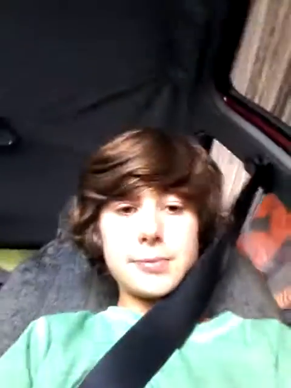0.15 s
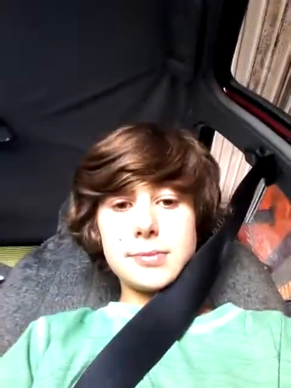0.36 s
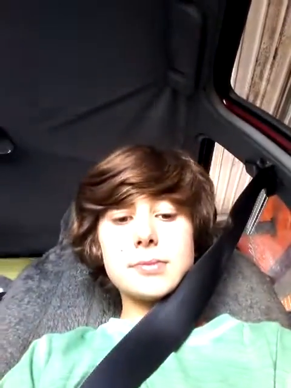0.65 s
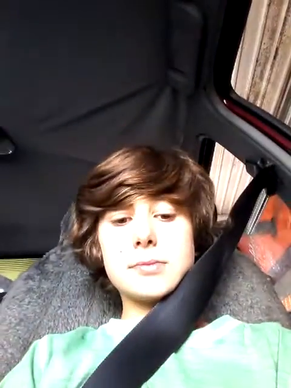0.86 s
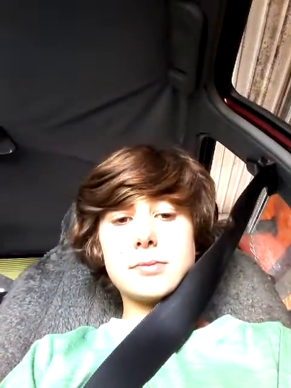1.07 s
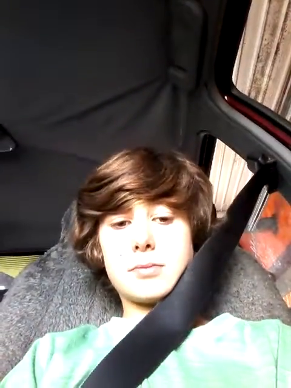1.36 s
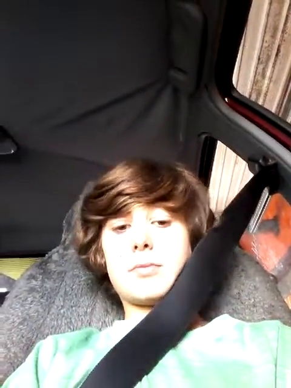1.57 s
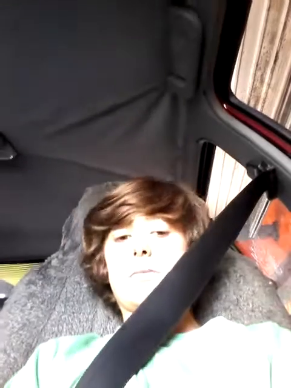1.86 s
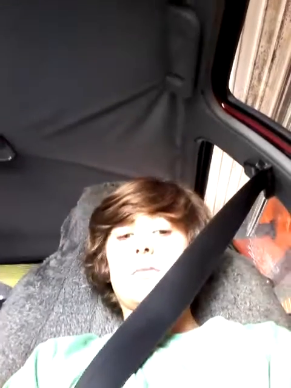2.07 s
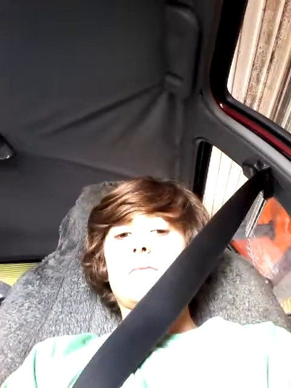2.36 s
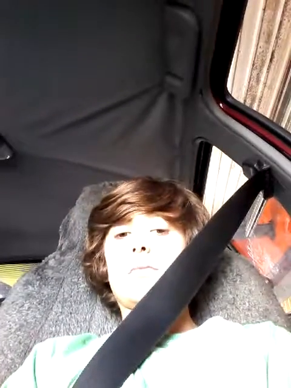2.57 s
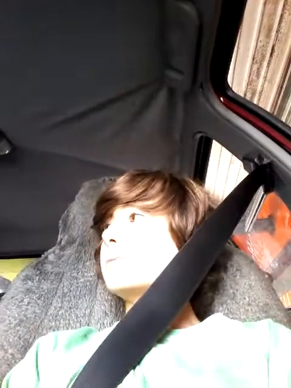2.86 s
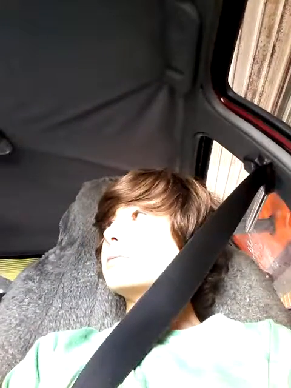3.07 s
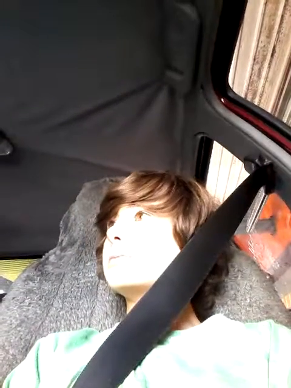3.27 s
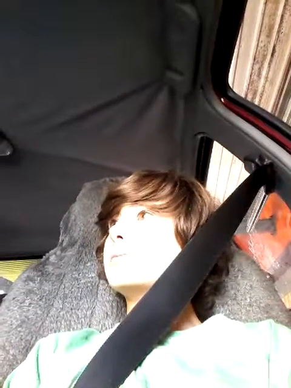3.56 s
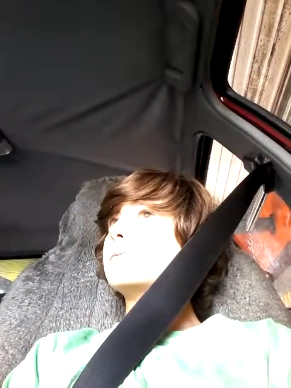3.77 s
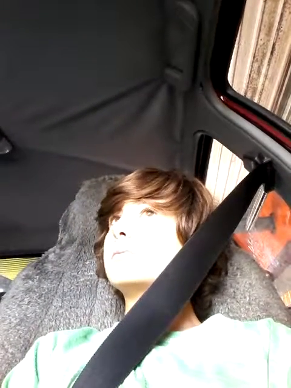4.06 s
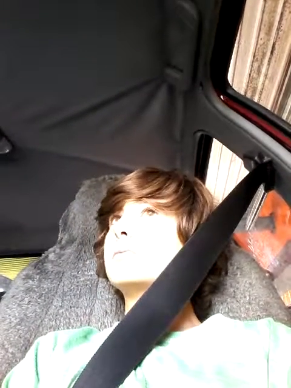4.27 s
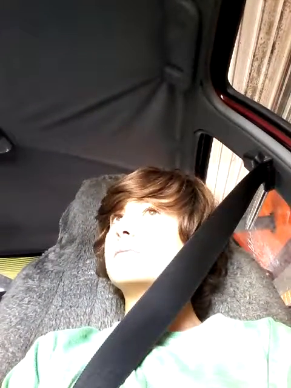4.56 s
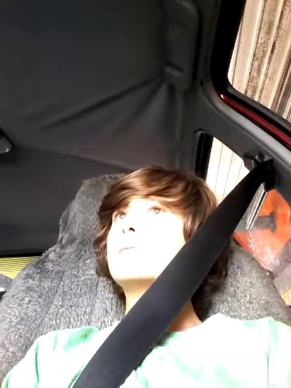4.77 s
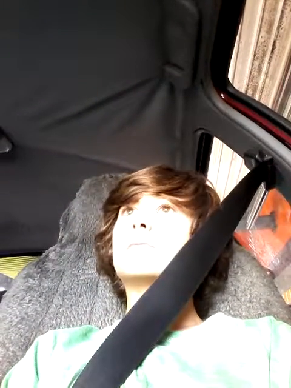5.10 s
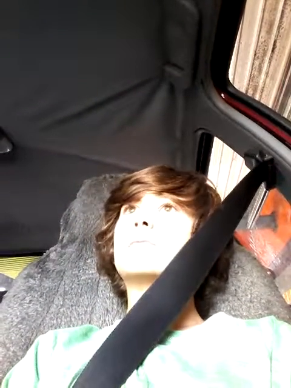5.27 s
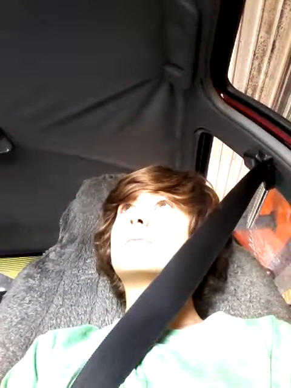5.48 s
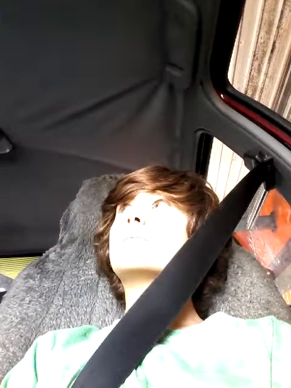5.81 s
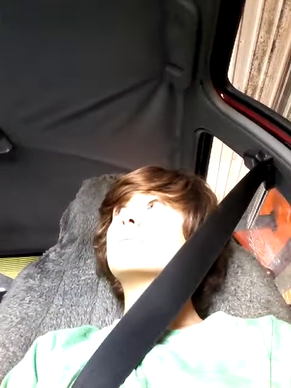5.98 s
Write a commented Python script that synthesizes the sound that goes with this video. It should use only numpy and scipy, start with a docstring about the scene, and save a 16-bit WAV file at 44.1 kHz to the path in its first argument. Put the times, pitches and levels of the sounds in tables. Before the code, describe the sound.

Heard from inside a car, wash-bay dryers roar and boom against the body, a hissing spray crosses the side glass, then the thunder slowly eases.

```python
"""Car wash dryers heard from inside the car

The car creeps out from under the air jets, which buffet its body and make the cabin boom.
The blowers roar and rush in the bay while their fans hum; all are shaped and layered noise.
A jet sweeps over the side glass with a hissing spray: noise and random drops,
with short spatters and the ticks of large drops."""
import sys
import numpy as np
from scipy import signal
from scipy.fft import rfft, irfft
from scipy.io import wavfile

SR = 44100
rng = np.random.default_rng(int(sys.argv[2]) if len(sys.argv) > 2 else 0)


def put_to_file(sound):
    """Save the sound as 16-bit audio at rate SR, in the file named by the first command-line argument."""
    columns = np.atleast_2d(sound).T  # one column per channel
    safe = np.clip(columns, -1, 1)
    whole_steps = np.round(safe * 32767)
    wavfile.write(sys.argv[1], SR, whole_steps.astype(np.int16))


N = 271038
T = np.arange(N) / SR  # time of each sample, in seconds
HZ = np.fft.rfftfreq(N, 1 / SR)  # frequency of each spectrum bin


def gain_of(db):
    """Turns decibels into an amplitude factor."""
    return 10 ** (np.asarray(db) / 20)


def evened(x):
    """Scales a sound to an rms (average strength) of one."""
    return x / np.sqrt(np.mean(x ** 2) + 1e-20)


def spectrum(points):
    """Joins (pitch_hz, level_db) points into a curve on a log-frequency axis."""
    hz, db = np.transpose(points)
    return np.interp(np.log(HZ + 1), np.log(hz + 1), db)


def curve(rows, order=1):
    """Draws one column of a time table as a line through every sample."""
    columns = np.transpose(rows)
    return np.interp(T, columns[0], columns[order])


def coloured(x, db):
    """Filters x by a curve in dB, then scales it to an rms of one."""
    return evened(irfft(rfft(x) * gain_of(db), N))


def noise(db):
    """Makes random noise with the given spectrum in dB."""
    return coloured(rng.standard_normal(N), db)


def eddies(rate_hz):
    """Makes smooth random swings, up to about rate_hz, like swirling air."""
    low_pass = np.exp(-(HZ / rate_hz) ** 2)
    return evened(irfft(rfft(rng.standard_normal(N)) * low_pass, N))


def steadied(x, seconds):
    """Evens out the swells of x that last longer than the given time."""
    smoothing = np.exp(-(HZ * seconds) ** 2 * 2)
    local_power = irfft(rfft(x ** 2) * smoothing, N)
    return x / np.sqrt(np.maximum(local_power, 1e-4))


def buffet(throb_db=1.8, throb_hz=16, shudder_swell_db=2.5, shudder_swell_hz=3):
    """Turbulent jets shake the roof and doors; eddies make the boom throb and the deep shudder swell."""
    # spectrum of the booming panels: pitch_hz [Hz], level_db [dB per Hz]
    boom_points = [(45, -39.5), (68, -15.5), (80, 3.5), (95, -1), (125, -0.5), (172, -2), (195, -10),
                   (235, -15.5), (290, -22.5), (400, -34), (700, -35.5), (1500, -81.5)]
    # spectrum of the body's deep shudder: pitch_hz [Hz], level_db [dB per Hz]
    deep_points = [(20, -30.5), (36, -34), (43, -22.5), (52, -3), (66, 4), (76, -6), (95, -12.5),
                   (200, -80)]
    force_db = jet_force_db()
    boom = noise(spectrum(boom_points) + cabin())
    throbbing = boom * gain_of(throb_db * eddies(throb_hz))
    panels = steadied(throbbing, seconds=0.17) * gain_of(force_db)

    # the shudder is -36 dB at a force of -23.5 dB, and gains 0.54 dB per dB of force
    shudder_db = -36 + 0.54 * (force_db + 23.5)
    swell_db = shudder_swell_db * eddies(shudder_swell_hz)
    body = steadied(noise(spectrum(deep_points)), seconds=0.13) * gain_of(shudder_db + swell_db)
    return panels + body


def jet_force_db():
    """The force of the jets eases unevenly as the car leaves them, with brief gusts on top."""
    # slow force of the jets on the body: time_s [s], level_db [dB]
    slow_force = [(0, -16.5), (.28, -22), (.45, -20), (1.05, -17.5), (1.28, -21), (1.72, -19.5), (2.3, -21),
                  (2.95, -25), (3.45, -26.5), (3.62, -23), (4.2, -26), (5.45, -32.5), (5.93, -31),
                  (6.15, -34)]
    # brief changes of force, nearly all upward: middle_s [s], lift_db [dB], length_s [s]
    gusts = [(0.037, -2.5, 0.026), (0.387, 6.5, 0.053), (0.438, 6, 0.034), (0.663, 3.5, 0.068),
             (1.543, 4, 0.069), (1.765, 4, 0.065), (2.056, 5.5, .05), (2.478, 4.5, 0.043), (5.013, 3, .05)]
    gusts_db = sum(db * np.exp(-(2 * (T - s) / length) ** 2) for s, db, length in gusts)
    return curve(slow_force) + gusts_db


def blowers(flutter_db=0.34, flutter_hz=30):
    """Blown air makes a wide roar in the bay and a higher, fluttering rush at the nozzles."""
    # roar of the bay: pitch_hz [Hz], level_db [dB per Hz]
    roar_points = [(30, -34), (60, -9.5), (110, -4.5), (170, 7), (200, 0.5), (285, 6.5), (440, -3),
                   (540, -3.5), (620, 0.5), (780, -5.5), (950, -11.5), (1250, -13), (1600, -12.5),
                   (2000, -21), (3500, -53)]
    # rush of the nozzles: pitch_hz [Hz], level_db [dB per Hz]
    rush_points = [(600, -27), (1400, -4), (2000, 1), (2400, -0.5), (3300, -1), (4000, -6.5), (4900, -10),
                   (5700, -11.5), (6500, -10), (7300, -17.5), (8200, -31.5), (9500, -34), (15500, -36)]
    # both nearly hold while the jet is on the glass, then fall: time_s [s], roar_db [dB], rush_db [dB]
    blower_levels = [(0, -30.5, -47.5), (1.2, -30, -47), (2.7, -30.5, -46.5), (3.1, -32, -48.4),
                     (4.5, -33, -48), (6.15, -33, -49.5)]
    roar = steadied(noise(spectrum(roar_points) + cabin()), seconds=0.25)
    roar = roar * gain_of(curve(blower_levels))
    rush = noise(spectrum(rush_points) + cabin()) * gain_of(curve(blower_levels, order=2))
    return roar + rush * gain_of(flutter_db * eddies(flutter_hz))


def fans(width_hz=9, beat_db=1.0, beat_hz=0.82, loudest_s=1.05, skirt_width_hz=30, skirt_db=-50):
    """Fans at almost the same speed blur into a slowly beating hum with a noisy skirt."""
    blade_rate_hz = 593.2

    def tone(width):
        """Makes noise in a narrow band round the rate at which the blades pass."""
        return noise(-20 * np.log10(1 + (2 * (HZ - blade_rate_hz) / width) ** 2))

    beat = beat_db * np.cos(2 * np.pi * beat_hz * (T - loudest_s))
    level_db = -48.5 + 0.38 * T + beat  # grows slowly, by 0.38 dB per second
    hum = steadied(tone(width_hz), seconds=0.15) * gain_of(level_db)
    return hum + gain_of(skirt_db) * tone(skirt_width_hz)


def spray(drops_per_s=1100, drop_spread_db=3.0, drops_db=0.0, gust_db=2.0, gust_hz=55):
    """Fine drops pelt the glass in a hiss of air, coming in gusts and short spatters."""
    # hiss on the glass: pitch_hz [Hz], level_db [dB per Hz]
    hiss_points = [(1200, -30.5), (2800, -8.5), (4100, -9), (4900, -9), (5350, -8.5), (5750, -10.5),
                   (6200, -0.5), (6550, -0.5), (7050, -9), (7350, -14), (8000, -25.5), (9500, -29.5),
                   (15500, -39.5)]
    sizes = gain_of(drop_spread_db * np.minimum(rng.exponential(1, N), 3))
    sizes = sizes * rng.choice([-1, 1], N)
    drops = evened(sizes * (rng.random(N) < drops_per_s / SR))
    force = spray_force()
    # the harder the jet hits the glass, the more water it carries and the more it sputters
    wetness = np.sqrt(force / force.max())
    pelting = rng.standard_normal(N) + gain_of(drops_db) * wetness * drops
    sputter = gain_of(gust_db * wetness * eddies(gust_hz))
    hiss = coloured(pelting, spectrum(hiss_points) + cabin())
    return force * steadied(hiss * sputter, seconds=0.075)


def spray_force():
    """A thin, fading mist, the sweeps of the jet and single spatters all hit the glass."""
    # the jet slides on, dwells and slides off: arrival_s [s], dwell_s [s], level_db [dB], rise [dB per s]
    sweeps = [(1.95, .15, -48, 11.5), (2.33, 0.23, -48, 149)]
    fall_db_per_s = 46
    # single spatters, loudest half a length after the start: start_s [s], level_db [dB], length_s [s]
    spatters = [(1.472, -49, 0.027), (1.52, -54, .03), (1.612, -54, .03), (1.753, -47, .035),
                (2.038, -50, 0.028), (2.068, -48, 0.015), (2.295, -52, .04), (2.471, -50, 0.013),
                (2.595, -50, .014), (2.635, -46, 0.033), (2.71, -53, 0.023), (2.817, -54, .06),
                (2.97, -50, 0.038), (3.34, -54, .03)]
    force = gain_of(-58.5 - 0.35 * T)  # the mist fades by 0.35 dB per second
    for s, dwell, db, rise in sweeps:
        before = np.maximum(s - T, 0)
        after = np.maximum(T - s - dwell, 0)
        sweep = gain_of(db - rise * before - fall_db_per_s * after)
        force = np.hypot(force, sweep)  # adds the powers
    for s, db, length in spatters:
        age = np.maximum(T - s, 0) / (length / 2)
        force = np.hypot(force, gain_of(db) * age * np.exp((1 - age ** 2) / 2))
    return force


def large_drops(per_s=160, level_db=-47, spread_db=2.0):
    """Now and then a large drop ticks on the glass, most often at the height of a sweep."""
    # tick of a large drop: pitch_hz [Hz], level_db [dB per Hz]
    tick_points = [(1500, -23), (3500, -3), (5200, -1), (6500, 13), (8000, -7), (12000, -8), (15500, -9.5)]
    force = spray_force()
    share = force / force.max()
    hits = rng.random(N) < share ** 2 * per_s / SR
    sizes = gain_of(spread_db * np.minimum(rng.exponential(1, N), 3))
    colour = gain_of(spectrum(tick_points))
    return gain_of(level_db) * irfft(rfft(hits * sizes) * colour / colour.mean(), N)


def cabin():
    """The cabin and the bay strengthen some pitches and weaken others; gives the change in dB."""
    # resonances (lift above 0) and notches (below 0): pitch_hz [Hz], width_hz [Hz], lift_db [dB]
    resonances = [(104.2, 12, 3), (164, 22, 2.5), (209.5, 21, 3), (247, 17, 1), (285, 16, 3), (324, 10, -4),
                  (354, 36, 3), (470, 76, 1.5), (860, 37, 5), (1081, 52, 6.5), (1250, 34, 3),
                  (1440, 70, 1.5), (1554, 30, -3.5), (2004, 58, -3.5), (2440, 180, 3.5), (3420, 110, -2.5),
                  (3546, 59, 1.5), (3730, 50, 3.5), (4200, 160, 3), (7140, 110, -6), (7990, 130, 1),
                  (8280, 220, 2.5)]
    return sum(db / (1 + (2 * (HZ - hz) / width) ** 2) for hz, width, db in resonances)


def reflections(x, echo_db=-15.5, t60=0.043, count=120):
    """Glass and trim return many small echoes, which ripple the colour of the treble."""
    delay = rng.uniform(.002, .04, count)  # seconds
    taps = np.zeros(N)
    # echoes die away by 60 dB in t60 seconds
    taps[(delay * SR).astype(int)] = rng.choice([-1, 1], count) * gain_of(-60 * delay / t60)
    treble = HZ ** 2 / (HZ ** 2 + 1000 ** 2)
    echoes = gain_of(echo_db) * treble * rfft(taps) / np.linalg.norm(taps)
    return irfft(rfft(x) * (1 + echoes), N)


def scene():
    """All the sources mix in the cabin and reach both sides, much of the treble stronger on the right."""
    # loudness of the left side against the right: pitch_hz [Hz], left_minus_right_db [dB]
    balance = [(60, -1), (500, -1.05), (1200, -1.6), (2000, -2.2), (3100, -3.3), (4000, -6.2), (4900, -8.4),
               (5600, -8.2), (6600, -6), (7400, -3.3), (7800, 0)]
    inside = rfft(reflections(buffet() + blowers() + fans() + spray() + large_drops()))
    ratio = gain_of(spectrum(balance))
    sides = 2 * np.array([ratio, np.ones_like(ratio)]) / (1 + ratio)
    return irfft(inside * sides, N)


def record(dry):
    """A steep low-pass filter takes away the highest treble."""
    edge_hz = 15720
    low_pass = signal.firwin(511, edge_hz, window=("kaiser", 9), fs=SR)
    return signal.oaconvolve(dry, low_pass[None], "same")


dry = scene()
out = record(dry)
put_to_file(out)
```